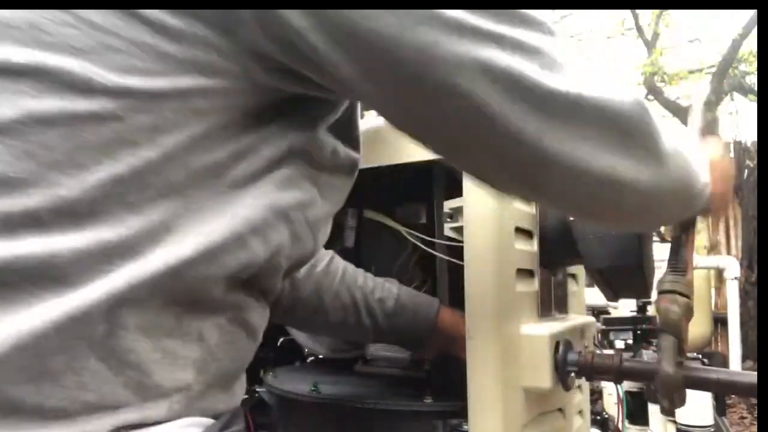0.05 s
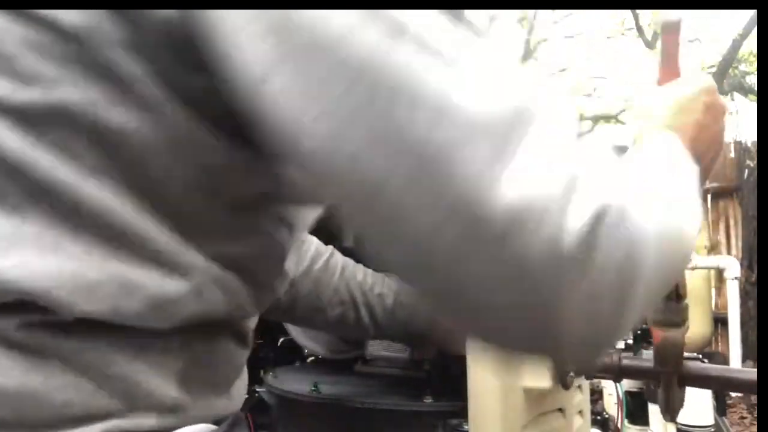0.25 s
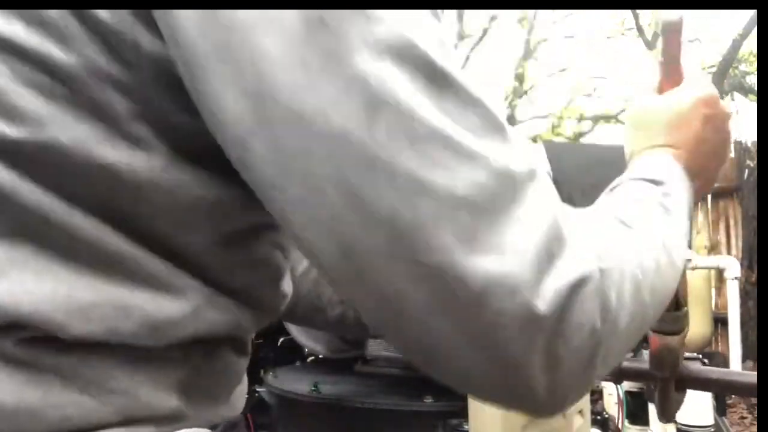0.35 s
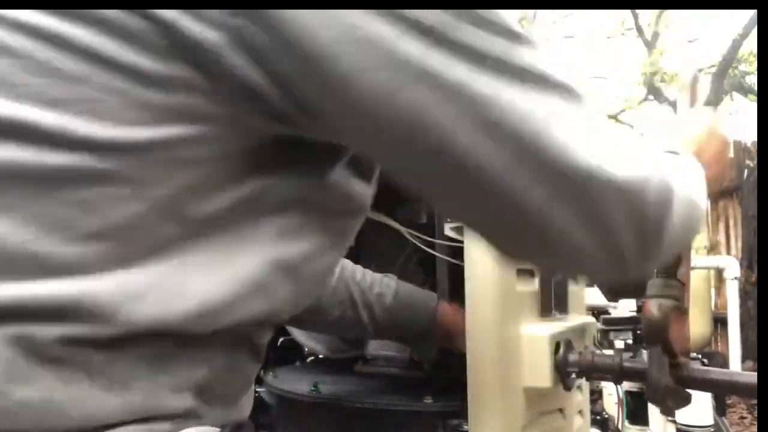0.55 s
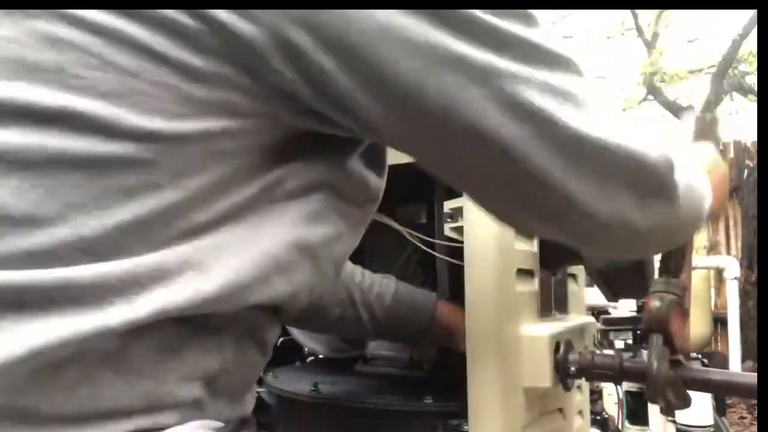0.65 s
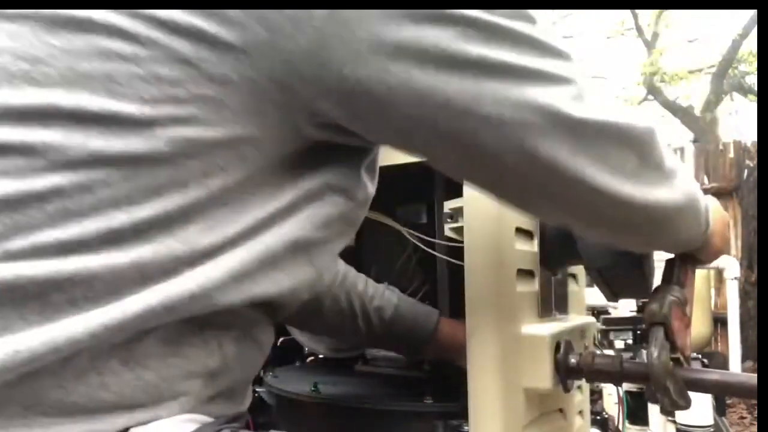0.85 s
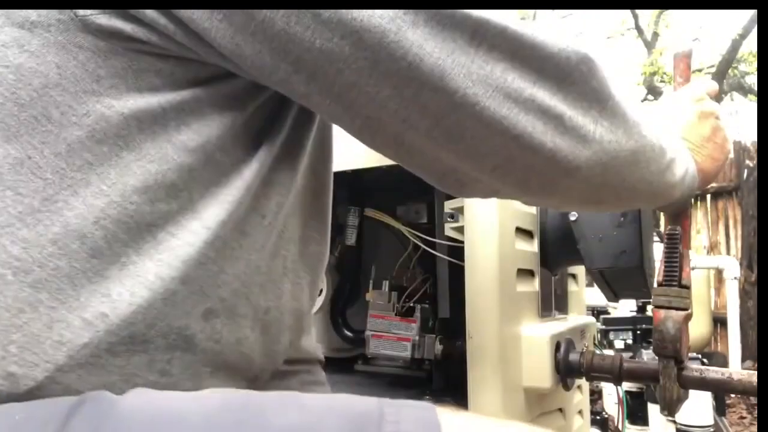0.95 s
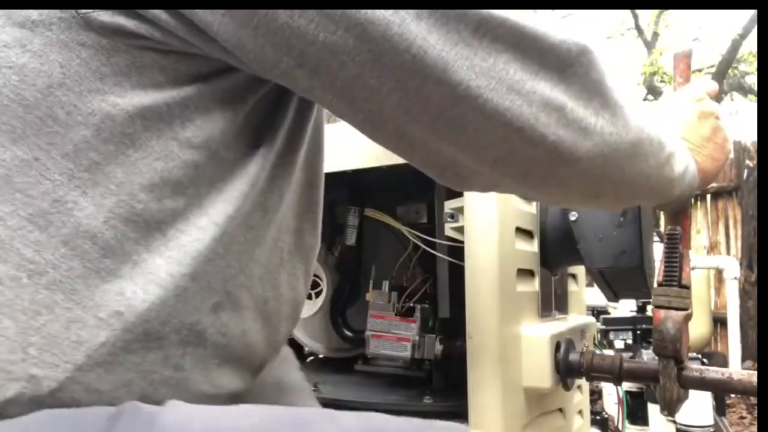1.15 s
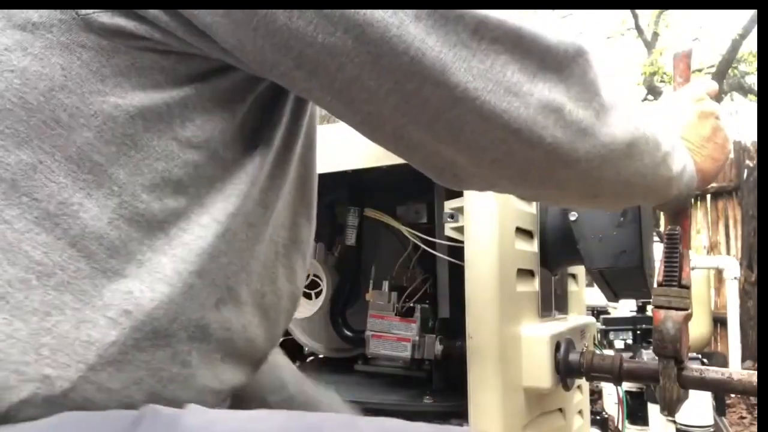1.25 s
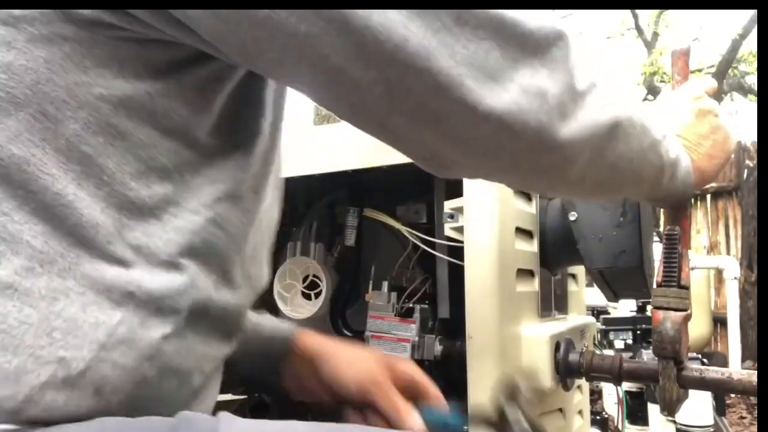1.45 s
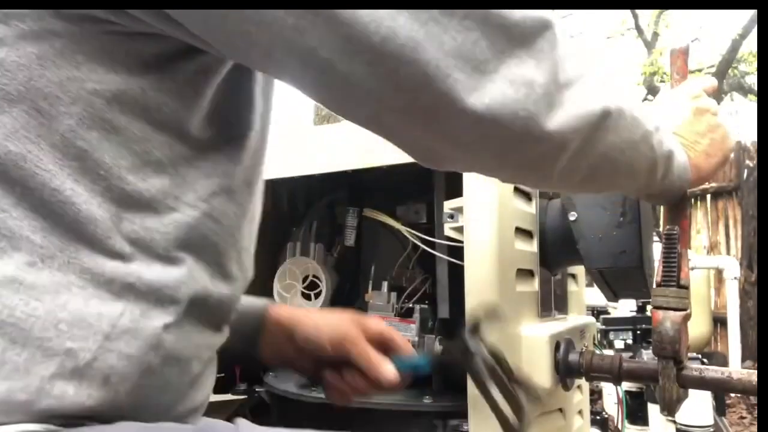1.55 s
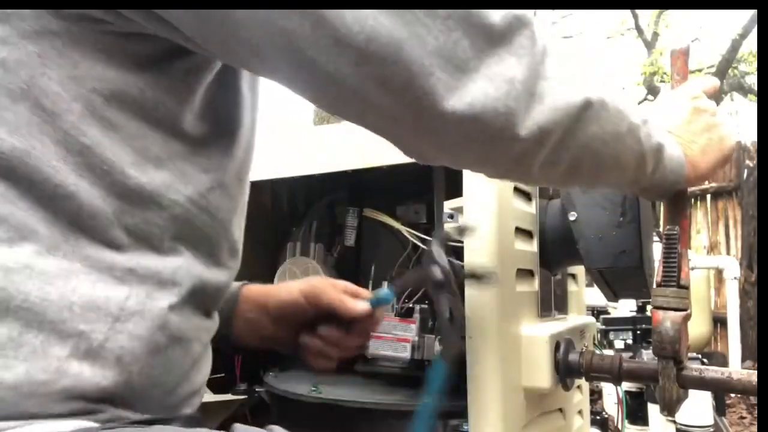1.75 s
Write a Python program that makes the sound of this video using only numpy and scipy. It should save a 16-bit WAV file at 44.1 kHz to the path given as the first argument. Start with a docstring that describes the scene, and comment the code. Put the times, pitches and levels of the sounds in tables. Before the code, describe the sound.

A pipe wrench clanks and squeaks on a pipe, followed by bright clinks of hand tools.

```python
"""A pipe wrench shifts on a steel pipe that enters a sheet-metal heater cabinet, outdoors.
Its jaw knocks, snaps, drags and squeaks, ringing the pipe's modes; the wrench clanks, a small steel
part pings and the cabinet shudders. Then steel hand tools clink and slide against each other and one
bumps the cabinet panel. A sleeve rustles over quiet outdoor air."""
import sys
import numpy as np
from scipy import signal
from scipy.io import wavfile

SR = 44100
rng = np.random.default_rng(int(sys.argv[2]) if len(sys.argv) > 2 else 0)


def transcribe(u):
    """Save the signal u as a 16-bit wav file named by the first command-line argument.

    u: samples, shape (n,) or (channels, n), limited to [-1, 1]; the rate is SR.
    q: integer samples, one column per channel.
    """
    v = np.clip(np.atleast_2d(u).T, -1, 1)
    q = np.round(v * 32767).astype(np.int16)
    wavfile.write(sys.argv[1], SR, q)


N = 79380
TIME_S = np.arange(N) / SR
BANDS_HZ = 31.25 * 2 ** (np.arange(28) / 3)
BEND_DELAY_S, BEND_RISE_S = 0.001943, 0.0025  # bending wave at 1 kHz

# pipe modes: pitch_hz, level_db, t60_s
PIPE_MODES = [(260.3, -5.5, 0.26), (402.4, 3, 0.2), (469.7, -5, 0.14), (690.2, -3, 0.15), (743, -10, 0.37),
              (930.4, -8.5, 0.21), (1389.6, -2, 0.084), (1910, -20, 0.24)]
# loose steel part's modes: pitch_hz, level_db, t60_s
PING_MODES = [(10850, -4, 0.15), (11310, -9, 0.067), (11900, -10, 0.07)]
# strong tool modes: pitch_hz, level_db
TOOL_MODES = [(2100, -8), (3274, -6.5), (3450, 1), (3865, -2), (5032, -4.5), (5500, -6), (5850, -7),
              (6900, -8), (7160, -7)]
# spectrum of the dense, weak tool modes: band_hz, level_db
TOOL_CROWD = [(1200, -10), (2600, -15.5), (3600, -9), (6500, -6.5), (8700, -15.5), (10300, -7.5),
              (15500, -19)]


def pipe_knocks(ring_db=-2.5):
    """Jaw knocks, and lastly a tool's bump on the cabinet, ring the pipe's modes, treble first."""
    # knock spectrum points: band_hz
    knock_bands_hz = [260, 750, 1400, 3500, 10000]
    # knocks: start_s, then level_db at each of knock_bands_hz
    knocks = [(0.189, -44, -40, -42.5, -34.5, -61), (0.2347, -32, -31.5, -21.5, -38, -52),
              (0.2404, -16.5, -26, -29.5, -22.5, -45), (0.326, -23.5, -27.5, -48, -51, -64),
              (0.4835, -27, -26.5, -20, -45.5, -47.5), (0.494, -29.5, -23, -72, -70, -80),
              (0.6664, -39.5, -23, -23, -16.5, -32), (0.7972, -35.5, -36.5, -32, -29, -42.5),
              (1.153, -33, -32.5, -20.5, -31.5, -42)]
    # dense, weak pipe modes: band_hz, level_db, t60_s
    crowd = [(134, -22.5, 0.14), (387, -6, 0.18), (1090, -12.5, 0.15), (1570, -2.5, 0.094),
             (3800, -4.5, 0.042), (15500, -10, 0.063)]
    blows = [(start_s, list(zip(knock_bands_hz, levels_db))) for start_s, *levels_db in knocks]
    out = np.zeros(N)
    for hz, mode_db, t60_s in PIPE_MODES:
        for start_s, spectrum in blows:
            gain = from_db(ring_db + mode_db + at_hz(spectrum, hz))
            add(out, arrival_s(start_s, hz), gain * ring(hz, BEND_RISE_S * slowness(hz), t60_s))
    for hz in BANDS_HZ[6:]:
        t60_s = at_hz(crowd, hz, column=2)
        shape = envelope(BEND_RISE_S * slowness(hz), t60_s, tail_db=-29, tail_t60_s=0.55)
        power = np.zeros(N)
        for start_s, spectrum in blows:
            gain = from_db(at_hz(crowd, hz) + at_hz(spectrum, hz))
            add(power, arrival_s(start_s, hz), (gain * shape) ** 2)
        out += np.sqrt(power) * band_noise(hz)
    return out


def wrench_clank(start_s=0.6665):
    """The wrench drops back on the pipe and its own steel rings."""
    # wrench modes: pitch_hz, level_db, t60_s
    modes = [(925, -28, 0.18), (1450, -29, 0.19), (2473, -25, 0.059), (3350, -25.5, .05),
             (4340, -23, 0.056), (11580, -33.5, 0.07)]
    return struck(modes, start_s, BEND_RISE_S)


def squeaks():
    """Steel slips on steel; one mode swells and dies."""
    # slips: start_s, length_s, pitch_hz, level_db
    slips = [(0.251, 0.024, 1370, -18.5), (0.243, 0.049, 691, -22), (0.492, 0.042, 692, -22.5),
             (0.815, 0.061, 255, -37), (1.04, .11, 5035, -29.5)]
    out = np.zeros(N)
    for start_s, length_s, hz, level_db in slips:
        n = int(length_s * SR)
        add(out, start_s, from_db(level_db) * np.hanning(n) * tone(hz, n))
    return out


def jaw_drag(whine_hz=1875):
    """The dragging jaw whines, keeps the pipe ringing, scrapes and stirs the loose part."""
    # drag contour: time_s, level_db
    contour = [(.17, -62), (.28, -41.5), (.325, -29.5), (.375, -36.5), (.42, -62)]
    whine = from_db(-6) * rubbed([(whine_hz, 0)], width_hz=40)
    pipe = from_db(-1) * rubbed([mode for mode in PIPE_MODES if mode[0] < whine_hz], width_hz=19)
    scrape = from_db(-16) * rubbed(TOOL_MODES, width_hz=700)
    loose_part = from_db(-19) * rubbed(PING_MODES, width_hz=200)
    return gain_curve(contour) * (whine + pipe + scrape + loose_part)


def loose_part_pings(rise_s=0.00053):
    """A small steel part on the wrench rings very high when jolted."""
    # jolts: start_s, level_db
    jolts = [(0.365, -32), (0.518, -40.5)]
    out = np.zeros(N)
    for start_s, level_db in jolts:
        for hz, mode_db, t60_s in PING_MODES:
            add(out, start_s, from_db(level_db + mode_db) * ring(hz, rise_s, t60_s))
    return out


def steel_clinks(rise_s=0.0011, chatter_s=0.0027, t60_s=0.03, contact_db=-7.5, strong_db=-5, hiss_db=-5):
    """The jaw snaps on the pipe, then hand tools clink; each contact rings its pitch and nearby modes."""
    # contacts: start_s, level_db, contact_hz
    clinks = [(0.2415, -27, 3340), (0.722, -41.5, 4600), (0.799, -30.5, 3700), (0.975, -15, 6925),
              (0.9765, -24.5, 3865), (0.993, -17, 7140), (0.9975, -24, 5760), (1.014, -30, 6580),
              (1.031, -34, 5240), (1.050, -24.5, 5430), (1.0603, -10.5, 6430), (1.072, -20, 5050),
              (1.097, -22, 5340), (1.107, -16.5, 5660), (1.112, -13.5, 7380), (1.127, -24, 6850),
              (1.1525, -13.5, 6500), (1.159, -18, 5570), (1.168, -22.5, 4570), (1.203, -27.5, 4900),
              (1.2352, -38, 6200), (1.2588, -26.5, 6350), (1.2625, -25, 3540), (1.2975, -28.5, 4990),
              (1.3035, -34, 6000), (1.4095, -27, 3050), (1.5925, -49.5, 6950)]
    out = np.zeros(N)
    for start_s, level_db, contact_hz in clinks:
        add(out, start_s, from_db(level_db + contact_db) * ring(contact_hz, rise_s, t60_s, chatter_s))
        for hz, mode_db in TOOL_MODES:
            gain = from_db(level_db + strong_db + mode_db + rng.normal(0, 3))
            gain *= excitation(hz, contact_hz, spread_oct=0.45)
            detuned_hz = hz * (1 + 0.026 * rng.uniform(-0.98, 1))  # grip and contact point vary
            add(out, start_s, gain * ring(detuned_hz, rise_s, t60_s=0.035, hold_s=chatter_s))
    shape = envelope(rise_s, t60_s, tail_db=-38, tail_t60_s=0.22, hold_s=chatter_s)
    for hz in BANDS_HZ[16:]:
        power = np.zeros(N)
        for start_s, level_db, contact_hz in clinks:
            gain = from_db(level_db + at_hz(TOOL_CROWD, hz)) * excitation(hz, contact_hz)
            add(power, start_s, (gain * shape) ** 2)
            add(out, start_s, gain * weak_modes(hz, shape))
        out += from_db(hiss_db) * np.sqrt(power) * band_noise(hz)
    return out


def tool_slide(grain_s=0.00081, contact_hz=6000, grit_db=-3, ring_db=-1):
    """Tools grate and ring; each band mixes shared catches with its own, so the colour shifts."""
    # slide contour: time_s, level_db
    contour = [(.87, -72), (.955, -45), (1.03, -35), (1.085, -30.5), (1.15, -29), (1.19, -47), (1.5, -63.5)]
    grit, shared_catches = np.zeros(N), catches()
    for hz in BANDS_HZ[16:]:
        grains = signal.lfilter([1], [1, -np.exp(-1 / (grain_s * SR))], shared_catches + catches())
        gain = from_db(at_hz(TOOL_CROWD, hz)) * excitation(hz, contact_hz)
        grit += gain * grains * band_noise(hz)
    ringing = rubbed(TOOL_MODES, width_hz=74)
    return gain_curve(contour) * (from_db(grit_db) * grit / grit.std() + from_db(ring_db) * ringing)


def cabinet_bump(start_s=1.154):
    """A tool bumps the panel; it booms, low modes swelling last."""
    # panel modes: pitch_hz, level_db, t60_s
    modes = [(149.7, -25.5, 0.19), (225, -29, 0.31), (291, -15.5, 0.069), (552.6, -30, 0.14),
             (1122, -11.5, 0.042)]
    return struck(modes, start_s, rise_1khz_s=0.0067)


def cabinet_shudder():
    """The sheet metal rumbles under the wrench."""
    # shudder contour: time_s, level_db
    contour = [(.19, -51), (.3, -34.5), (.42, -41.5), (.6, -40), (.76, -30), (.85, -43), (.96, -54.5)]
    # shudder spectrum: band_hz, level_db
    spectrum = [(30, -34), (48, -1.5), (160, 3.5), (300, 1.5), (700, -3.5), (6000, -25)]
    return gain_curve(contour) * coloured_noise(spectrum)


def sleeve_and_air():
    """Sleeve rustle and outdoor air as one soft broadband noise."""
    # rustle contour: time_s, level_db
    contour = [(.14, -50.5), (.21, -47.5), (.95, -46), (1.25, -44.5), (1.39, -42.5), (1.52, -48.5),
               (1.57, -60.5), (1.67, -59), (1.71, -49.5)]
    # rustle spectrum: band_hz, level_db
    spectrum = [(30, -17), (60, -9.5), (330, -1.5), (1000, -0.5), (2500, -6), (6000, -7), (15500, -16)]
    return gain_curve(contour) * coloured_noise(spectrum)


def slowness(hz):
    """Bending-wave travel time relative to 1 kHz."""
    return np.sqrt(1000 / hz)


def arrival_s(start_s, hz):
    """Arrival of a bending wave; bass comes later."""
    return start_s + BEND_DELAY_S * slowness(hz)


def struck(modes, start_s, rise_1khz_s):
    """One blow on steel; low modes arrive and swell later."""
    out = np.zeros(N)
    for hz, level_db, t60_s in modes:
        mode = ring(hz, rise_1khz_s * slowness(hz), t60_s)
        add(out, arrival_s(start_s, hz), from_db(level_db) * mode)
    return out


def excitation(hz, contact_hz, spread_oct=0.99):
    """A contact's drive on a frequency, Gaussian in octaves."""
    return np.exp(-0.5 * (np.log2(hz / contact_hz) / spread_oct) ** 2)


def weak_modes(hz, shape, count=3):
    """Random pitches within a third octave, 0.1 s long."""
    t = TIME_S[:SR // 10]
    pitches_hz = hz * 2 ** (rng.uniform(-1, 1, (count, 1)) / 6)
    sines = np.sin(2 * np.pi * (pitches_hz * t + rng.random((count, 1))))
    return shape[:len(t)] * sines.sum(0) / np.sqrt(count)


def catches(rate_per_s=530):
    """Tiny random impulses of steel rubbing on steel."""
    return (rng.random(N) < rate_per_s / SR) * rng.uniform(0.12, 1, N) + 1e-18


def rubbed(modes, width_hz):
    """Resonators driven by catches, rms 1."""
    radius = np.exp(-np.pi * width_hz / SR)
    out, drive = np.zeros(N), catches()
    for hz, level_db, *_ in modes:
        feedback = [1, -2 * radius * np.cos(2 * np.pi * hz / SR), radius ** 2]
        out += from_db(level_db) * signal.lfilter([1, 0, -1], feedback, drive)
    return out / out.std()


def ring(hz, rise_s, t60_s, hold_s=0):
    """One struck mode."""
    shape = envelope(rise_s, t60_s, hold_s=hold_s)
    return shape * tone(hz, len(shape))


def tone(hz, n):
    """Sine of random phase, rms 1."""
    return np.sqrt(2) * np.sin(2 * np.pi * (hz * TIME_S[:n] + rng.random()))


def envelope(rise_s, t60_s, tail_db=-200, tail_t60_s=1, hold_s=0):
    """Linear rise; after hold_s, a decay with a weaker, longer tail."""
    t = TIME_S[:SR // 2]
    fall = np.log(1000) * np.maximum(t - hold_s, 0)
    decay = np.exp(-fall / t60_s) + from_db(tail_db) * np.exp(-fall / tail_t60_s)
    return np.minimum(t / rise_s, 1) * decay


def band_noise(hz):
    """Third-octave noise, rms 1."""
    sos = signal.butter(2, [hz / 2 ** (1 / 6), hz * 2 ** (1 / 6)], "band", fs=SR, output="sos")
    noise = signal.sosfilt(sos, rng.standard_normal(N + SR // 4))[-N:]
    return noise / noise.std()


def coloured_noise(spectrum):
    """Noise with the given relative band levels, rms 1."""
    noise = sum(from_db(at_hz(spectrum, hz)) * band_noise(hz) for hz in BANDS_HZ)
    return noise / noise.std()


def at_hz(table, hz, column=1):
    """Interpolate a column over log frequency."""
    columns = np.transpose(table)
    return np.interp(np.log(hz), np.log(columns[0]), columns[column])


def gain_curve(contour):
    """Gain per sample from rows of time_s, level_db."""
    return from_db(np.interp(TIME_S, *np.transpose(contour)))


def from_db(db):
    """Decibels to gain."""
    return 10 ** (np.asarray(db) / 20)


def add(out, start_s, sound):
    """Mix a sound in at start_s."""
    i = int(start_s * SR)
    out[i:i + len(sound)] += sound[:N - i]


def scene():
    """All sources, close to one microphone."""
    background = cabinet_shudder() + sleeve_and_air()
    knocks_and_scrapes = pipe_knocks() + wrench_clank() + squeaks() + jaw_drag()
    bright_steel = loose_part_pings() + steel_clinks() + tool_slide()
    return (knocks_and_scrapes + bright_steel + cabinet_bump() + background)[None]


def record(dry, low_cut_hz=42.4, high_cut_hz=15900):
    """The microphone rounds peaks, drops deep bass and cuts the top steeply."""
    low_cut = signal.butter(4, low_cut_hz, "high", fs=SR, output="sos")
    high_cut = signal.ellip(10, 0.1, 80, high_cut_hz, fs=SR, output="sos")
    return signal.sosfilt(high_cut, signal.sosfilt(low_cut, np.tanh(dry)))


dry = scene()
out = record(dry)
transcribe(out)
```